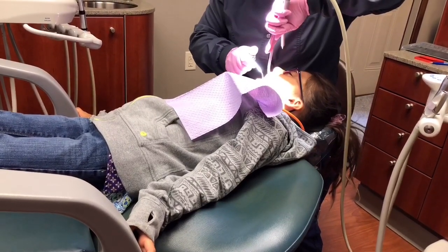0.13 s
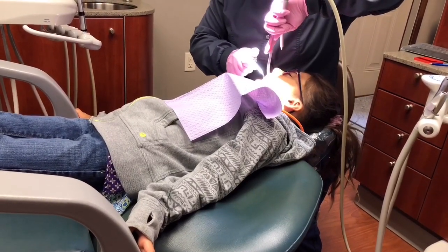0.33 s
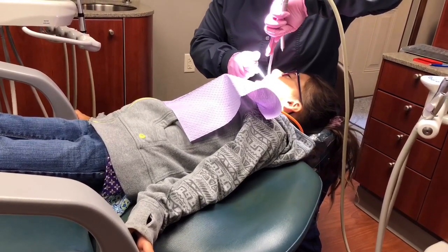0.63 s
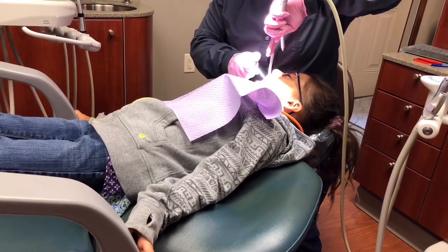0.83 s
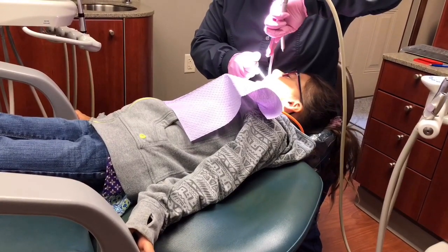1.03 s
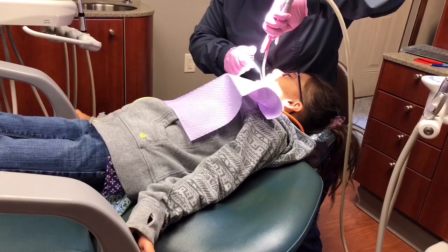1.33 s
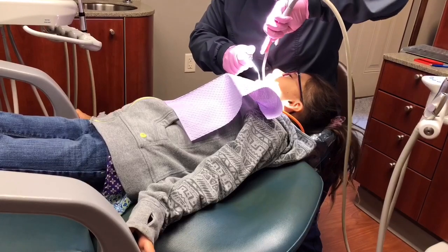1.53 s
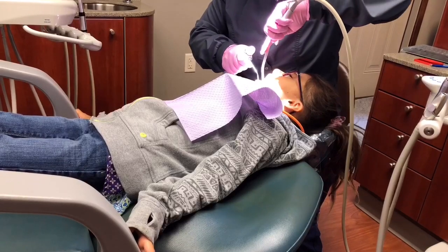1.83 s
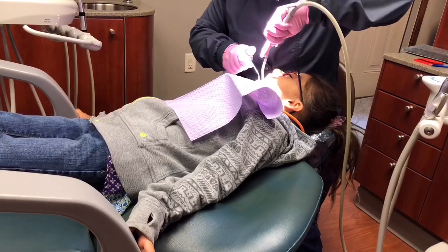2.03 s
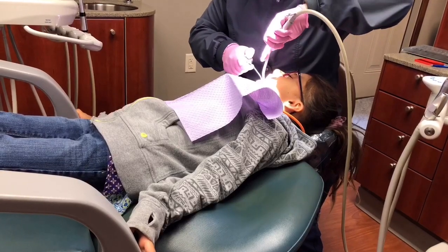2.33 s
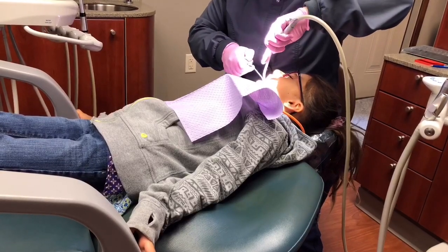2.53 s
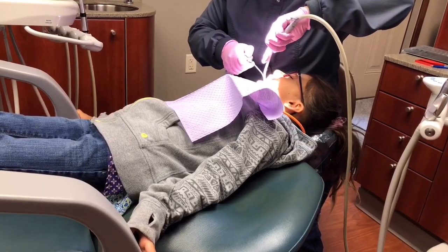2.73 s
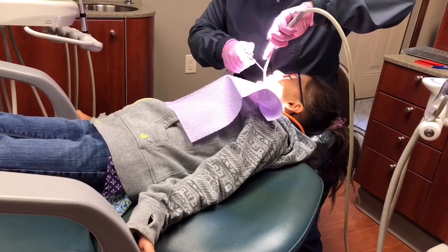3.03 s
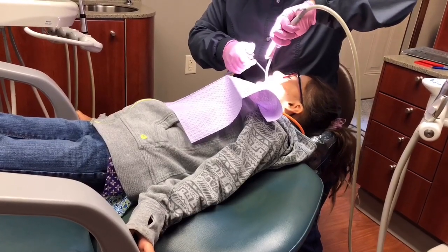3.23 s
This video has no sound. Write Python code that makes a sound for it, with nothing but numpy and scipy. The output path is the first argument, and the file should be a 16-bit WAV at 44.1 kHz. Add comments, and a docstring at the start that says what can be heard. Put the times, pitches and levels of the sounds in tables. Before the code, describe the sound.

Dental suction tube hisses brightly at a mouth, swelling and dropping in a small treatment room.

```python
"""A suction tube draws air at a mouth, close by in a small treatment room, heard by one microphone.
Hiss and droplet clicks at the tip excite the tube's resonances; these swell and sink as the tip is
freed or covered, the upper one slides with the gap, and water spits through the covered tip.
Filtered noise makes the ventilation below; wavering sines make a faint motor hum, and one low thrum sounds.
A short cloud of echoes sets the tube in the room."""
import sys
import numpy as np
from scipy import signal
from scipy.fft import rfft, irfft
from scipy.io import wavfile

SR = 44100
rng = np.random.default_rng(int(sys.argv[2]) if len(sys.argv) > 2 else 0)


def generate_wav(signal):
    """Clip the signal to [-1, 1] and save it as 16-bit WAV at the path in sys.argv[1]."""
    frames = np.transpose(np.atleast_2d(signal))
    scaled = np.clip(frames, -1, 1) * 32767
    pcm = np.round(scaled).astype(np.int16)
    wavfile.write(sys.argv[1], SR, pcm)


def volts(x):
    """Linear amplitude factor 10**(x/20) for a level x in dB, scalar or array-like."""
    e = np.asarray(x, float) / 20
    return 10 ** e


N = 149499

# Ventilation spectrum: (frequency [Hz], relative density [dB per Hz])
AIR_SPECTRUM = [(15, -57), (25, -34), (54, -6), (159, -3), (252, -2), (393, -2), (495, -15), (701, -11),
                (2500, -16.5), (3250, -56), (5500, -120)]
# Motor hum lines: (frequency [Hz], rms level before wavering [dB])
HUM_LINES = [(107.7, -62.5), (258.4, -57.5)]
# Tube levels as the tip is freed or covered, before flutter and peaks: (time [s], main resonance [dB],
# low resonance [dB], low rush [dB], treble hiss [dB], sliding resonance [dB], its centre [Hz])
TUBE_LEVELS = [(0.0, -33, -37, -44, -32, -30, 6580), (0.16, -33, -36.5, -41, -32, -29.5, 6640),
               (0.23, -30, -34, -39.5, -31, -36.5, 7040), (0.39, -36.5, -39, -48, -34, -39, 6700),
               (0.42, -33, -39, -50, -32.5, -32.5, 7500), (0.62, -34.5, -34.5, -44, -32, -31, 7550),
               (0.95, -30.5, -35, -44.5, -32.5, -31, 7340), (1.0, -27, -32, -48, -29, -30, 7350),
               (1.18, -26, -29, -44.5, -29, -30.5, 7430), (1.35, -40, -38.5, -44.5, -43.5, -44.5, 6500),
               (1.56, -39.5, -39.5, -46, -45.5, -47, 6730), (1.68, -42.5, -43, -48, -44.5, -43.5, 6670),
               (1.75, -36, -44, -48.5, -45.5, -45.5, 7400), (1.98, -44, -44, -51, -45, -39.5, 7570),
               (2.15, -38.5, -42, -50.5, -37.5, -36.5, 7390), (2.23, -31, -34, -40.5, -31, -31, 7840),
               (2.37, -26, -33, -39.5, -28.5, -27, 7700), (2.47, -33, -34.5, -41, -33.5, -33.5, 7530),
               (2.57, -24.5, -31.5, -47, -23.5, -26.5, 7830), (2.63, -38.5, -44.5, -68, -34, -34, 7840),
               (2.72, -44.5, -57, -78, -43.5, -43.5, 7100), (2.842, -44, -50.5, -65, -37, -43, 8340),
               (2.862, -31, -46.5, -81, -30, -28, 8150), (2.94, -29.5, -32, -48, -28.5, -28.5, 8000),
               (3.02, -41.5, -40.5, -48, -39.5, -39, 7850), (3.14, -40.5, -45.5, -48.5, -42, -40.5, 8050),
               (3.17, -35.5, -42.5, -49, -42, -41, 8300), (3.31, -33, -43.5, -55.5, -39.5, -37.5, 8500),
               (3.39, -30, -43, -49.5, -37, -33.5, 7800)]
# Centre of the main resonance: (time [s], frequency [Hz])
MAIN_CENTRE = [(0.0, 4830), (0.33, 5000), (0.58, 4785), (1.14, 5044), (1.74, 4830), (1.81, 4950),
               (2.6, 5060), (2.77, 4980), (2.89, 5090), (3.14, 4900), (3.16, 4770), (3.39, 4890)]
# Spectra of low resonance, low rush and treble hiss: (frequency [Hz], relative density [dB per Hz])
LOW_SPECTRUM = [(820, -58), (1400, -7.5), (1600, -7), (1850, 4.5), (2150, -2), (2290, -9.5), (2500, -6),
                (3400, -13.5), (4200, -13.5), (6500, -120)]
RUSH_SPECTRUM = [(260, -54), (503, -1.5), (567, -11.5), (824, 0), (1500, -1.5), (1950, -8), (3300, -120)]
TREBLE_SPECTRUM = [(5180, -14), (8800, 2.5), (11200, 3), (14300, 2.5), (15700, 1.5)]
# Steady narrow dip in the tube sound: (frequency [Hz], filter width [Hz], gain at its centre [dB])
STEADY_DIPS = [(4804, 14, -4)]
# Resonances that open for a while as the tip moves; a negative gain is a dip:
# (start [s], length [s], frequency [Hz], filter width [Hz], gain at full opening [dB])
PASSING_RESONANCES = [(-.03, 0.17, 7060, 350, -2), (0.356, 0.5, 10200, 500, 5), (0.388, 0.23, 6600, 800, 6),
                      (0.31, 0.54, 13100, 900, 4), (0.917, 0.32, 10900, 1400, 5),
                      (.95, 0.16, 13800, 900, 6), (1.262, 1, 6970, 450, 5.5), (1.398, 0.6, 8540, 450, 6.5),
                      (1.586, 0.65, 12200, 500, 7), (2.467, 0.19, 9170, 1010, 5.5),
                      (2.81, 0.17, 9180, 1210, 7), (3.152, .4, 14400, 1600, 9.5), (3.15, .4, 4260, 350, 6)]
# Water spits through the covered tip: (time [s], jump over the tube sound [dB])
WATER_SPITS = [(2.726, 4.1), (2.738, 7), (2.765, 6.8)]

AIR_START_DB, AIR_FADE_DB_PER_S = -47, 0.98
HUM_WAVER_DB, HUM_WAVER_HZ = 4.5, 1.7   # spread of level and of pitch
THRUM_START_S, THRUM_LENGTH_S, THRUM_HZ, THRUM_PEAK_DB = 1.46, 0.2, 112.7, -47.5
ROOM_T60_S, ROOM_DB, WALL_CUT_HZ = 0.22, -8, 5000   # echo level is relative to the direct sound
# Droplets drawn into the tip; their level is relative to the air noise
SPRAY_PER_S, SPRAY_SPREAD_DB, SPRAY_DB = 3000, 5.5, -8.5
# Resonators: width of one pass, level of the hiss around the peak, band of that hiss
MAIN_WIDTH_HZ, MAIN_SKIRT_DB, MAIN_BAND_HZ = 600, -8, (3700, 6300)
SLIDE_WIDTH_HZ, SLIDE_SKIRT_DB, SLIDE_BAND_HZ = 1000, 2.5, (5820, 9670)
# Slow chance in level: spread and corner rate
FLUTTER_DB, FLUTTER_RATE_HZ = 0.65, 27.5   # whole tube together
PATCHY_DB, PATCHY_RATE_HZ = 0.91, 3.14   # each part alone
MOTTLE_DB, MOTTLE_RATE_HZ, MOTTLE_WIDTH_HZ = 2, 1.18, 420   # strips of treble
LOW_MOTTLE_DB, LOW_MOTTLE_WIDTH_HZ = 2, 300   # strips around the low resonance
EDGE_S, SPIT_T60_S = 0.012, 0.047   # opening or closing ramp; dying of a spit


def seconds():
    """Time of every sample."""
    return np.arange(N) / SR


def in_time(rows):
    """Columns of a curve table, joined by straight lines at every sample."""
    times, *columns = np.transpose(rows)
    return [np.interp(seconds(), times, column) for column in columns]


def rms_one(x):
    """Scale to rms 1."""
    return x / np.sqrt(np.mean(x ** 2) + 1e-20)


def drift(rate_hz):
    """Slow chance of spread 1: noise through two one-pole low-passes, computed every 40 samples."""
    r = np.exp(-2 * np.pi * rate_hz * 40 / SR)
    noise = rng.standard_normal(N // 40 + 2002)
    slow = signal.lfilter([1], [1, -2 * r, r * r], noise)[2000:]   # skip the filter's start
    slow = rms_one(slow - slow.mean())
    return np.interp(np.arange(N) / 40, np.arange(len(slow)), slow)


def swell(start, length):
    """Ramps quickly from 0 to 1, holds and ramps back."""
    t = seconds() - start
    return np.clip(np.minimum(t, length - t) / EDGE_S, 0, 1)


def colour(x, spectrum):
    """Shape by a spectrum table, all but silent outside it; rms 1."""
    hz = np.arange(N // 2 + 1) * SR / N + 1e-3
    points_hz, points_db = np.transpose(spectrum)
    gain_db = np.interp(np.log(hz), np.log(points_hz), points_db, -120, -120)
    return rms_one(irfft(rfft(x) * volts(gain_db), N))


def ventilation():
    """Steady duct noise, shaped in frequency and slowly sinking."""
    level_db = AIR_START_DB - AIR_FADE_DB_PER_S * seconds()
    return volts(level_db) * colour(rng.standard_normal(N), AIR_SPECTRUM)


def motor_hum():
    """Faint sine lines whose pitch and level waver by chance."""
    hum = np.zeros(N)
    for hz, db in HUM_LINES:
        phase = 2 * np.pi * np.cumsum(hz + HUM_WAVER_HZ * drift(4.56)) / SR
        level_db = db + HUM_WAVER_DB * drift(4.7)
        hum += np.sqrt(2) * volts(level_db) * np.sin(phase)
    return hum


def thrum():
    """One soft low sine under a swell."""
    tone = np.sin(2 * np.pi * THRUM_HZ * seconds())
    return volts(THRUM_PEAK_DB) * swell(THRUM_START_S, THRUM_LENGTH_S) * tone


def room(x):
    """Direct sound plus a dying, dulled cloud of echoes, scaled to keep the total power."""
    t = np.arange(SR // 2) / SR
    dulled = signal.lfilter(*signal.butter(1, WALL_CUT_HZ, fs=SR), rng.standard_normal(len(t)))
    tail = dulled * volts(-60 * t / ROOM_T60_S) * (t > 0.004)   # 4 ms before the first echo
    tail = volts(ROOM_DB) * tail / np.sqrt(np.sum(tail ** 2))
    lead = x[len(t):0:-1]   # mirrored opening: the room is already ringing at the start
    wet = signal.fftconvolve(np.concatenate([lead, x]), tail)[len(lead):len(lead) + N]
    return (x + wet) / np.sqrt(1 + volts(2 * ROOM_DB))


def turbulence():
    """Air noise mixed with dense droplet clicks of random size and sign."""
    sizes_db = SPRAY_SPREAD_DB * np.minimum(rng.exponential(1, N), 5)
    sizes = volts(sizes_db) * rng.choice([-1, 1], N)
    spray = rms_one(sizes * (rng.random(N) < SPRAY_PER_S / SR))
    return rng.standard_normal(N) + volts(SPRAY_DB) * spray


def moving_resonance(x, centre_hz, width_hz, skirt_db, band_hz):
    """Two equal pole pairs whose centre moves every 128 samples, over a band of hiss; rms 1."""
    hiss = rms_one(signal.sosfilt(signal.butter(4, band_hz, "band", fs=SR, output="sos"), x))
    peak, state = np.zeros(N), np.zeros((2, 2))
    r = np.exp(-np.pi * width_hz / SR)
    for i in range(0, N, 128):
        poles = [1, -2 * r * np.cos(2 * np.pi * centre_hz[i] / SR), r * r]
        sections = [[1, 0, -0.82, *poles]] * 2
        peak[i:i + 128], state = signal.sosfilt(sections, hiss[i:i + 128], zi=state)
    return rms_one(rms_one(peak) + volts(skirt_db) * hiss)


def lift(x, hz, width_hz, db):
    """Raise or lower a narrow strip around hz; db may change in time."""
    section = np.concatenate(signal.iirpeak(hz, hz / width_hz, fs=SR))
    return x + (volts(db) - 1) * signal.sosfilt([section] * 2, x)


def peaks_and_mottle(x):
    """Fine resonances of the tube: a steady dip, passing peaks and strips that swell on their own."""
    for hz, width_hz, db in STEADY_DIPS:
        x = lift(x, hz, width_hz, db)
    for start, length, hz, width_hz, db in PASSING_RESONANCES:
        x = lift(x, hz, width_hz, db * swell(start, length))
    for hz in np.linspace(6000, 15400, num=12):
        x = lift(x, hz, MOTTLE_WIDTH_HZ, MOTTLE_DB * drift(MOTTLE_RATE_HZ))
    for hz in np.linspace(1600, 2350, num=5):
        x = lift(x, hz, LOW_MOTTLE_WIDTH_HZ, LOW_MOTTLE_DB * drift(2 * MOTTLE_RATE_HZ))
    return x


def spit_gain():
    """Gain that jumps as water spits through the covered tip, then dies away exponentially."""
    gain = np.ones(N)
    for start, db in WATER_SPITS:
        t = seconds() - start
        gain += (volts(db) - 1) * (t > 0) * volts(-60 * t.clip(0) / SPIT_T60_S)
    return gain


def suction():
    """Turbulence through each tube resonance, each on its own level, all fluttering together."""
    main_db, low_db, rush_db, treble_db, slide_db, slide_hz = in_time(TUBE_LEVELS)
    main_hz, = in_time(MAIN_CENTRE)
    main = moving_resonance(turbulence(), main_hz, MAIN_WIDTH_HZ, MAIN_SKIRT_DB, MAIN_BAND_HZ)
    low = colour(turbulence(), LOW_SPECTRUM)
    rush = colour(turbulence(), RUSH_SPECTRUM)
    treble = colour(turbulence(), TREBLE_SPECTRUM)
    slide = moving_resonance(turbulence(), slide_hz, SLIDE_WIDTH_HZ, SLIDE_SKIRT_DB, SLIDE_BAND_HZ)
    parts = [(main, main_db), (low, low_db), (rush, rush_db), (treble, treble_db), (slide, slide_db)]
    tube = np.zeros(N)
    for part, db in parts:
        tube += part * volts(db + PATCHY_DB * drift(PATCHY_RATE_HZ))
    flutter = volts(FLUTTER_DB * drift(FLUTTER_RATE_HZ))
    return peaks_and_mottle(tube * spit_gain() * flutter)


def scene():
    """The tube in its room over the background; one microphone feeds both channels."""
    background = ventilation() + motor_hum() + thrum()
    microphone = background + room(suction())
    return np.tile(microphone, (2, 1))


def roll_off(x):
    """The treble ends steeply here."""
    return signal.sosfilt(signal.butter(12, 17030, fs=SR, output="sos"), x)


def record(dry):
    """The finished mix, as it is kept."""
    return roll_off(dry)


dry = scene()
out = record(dry)
generate_wav(out)
```